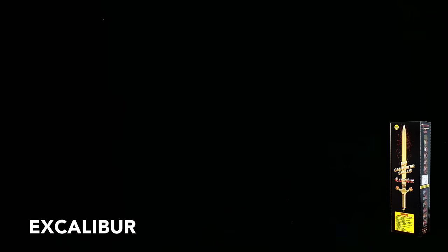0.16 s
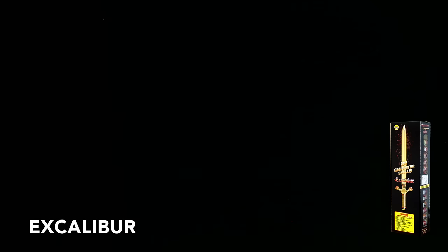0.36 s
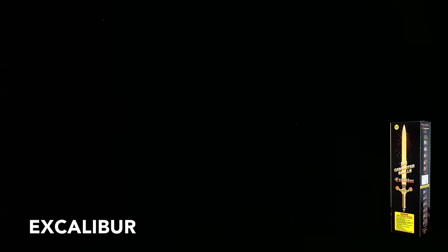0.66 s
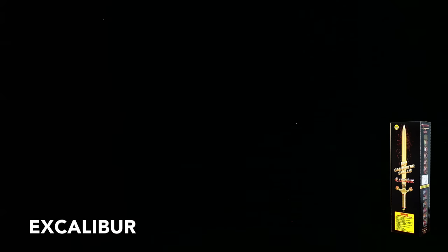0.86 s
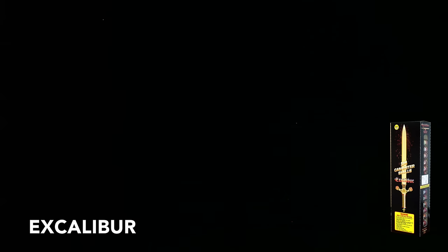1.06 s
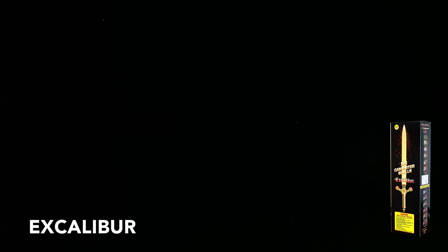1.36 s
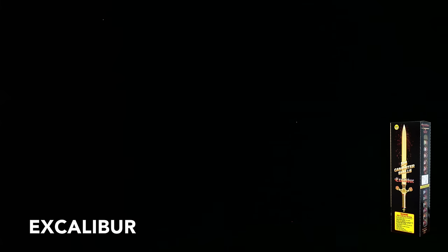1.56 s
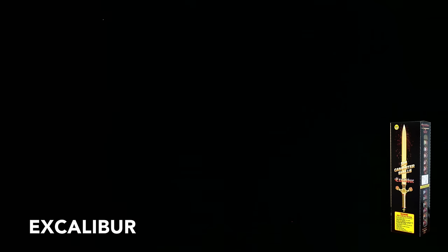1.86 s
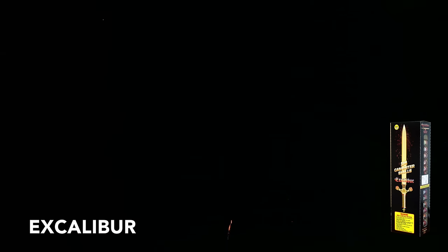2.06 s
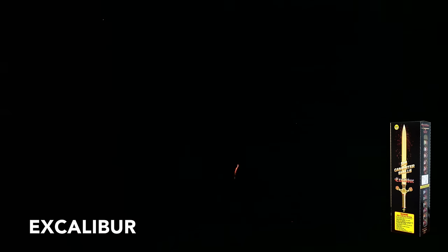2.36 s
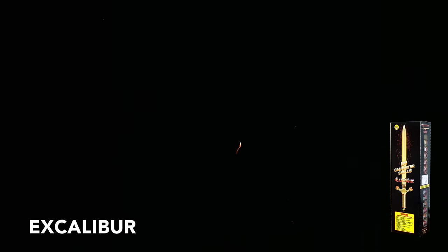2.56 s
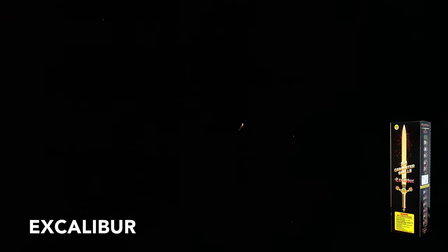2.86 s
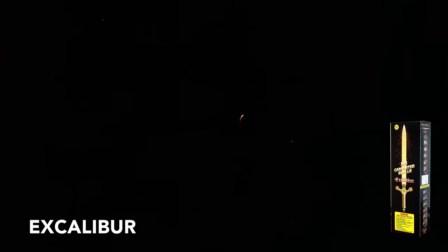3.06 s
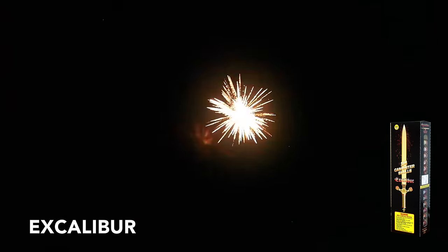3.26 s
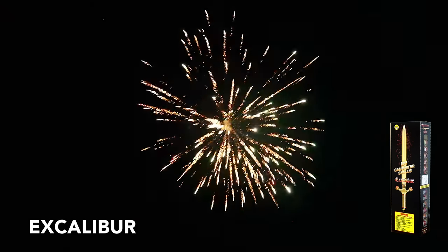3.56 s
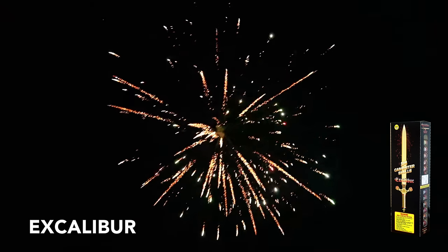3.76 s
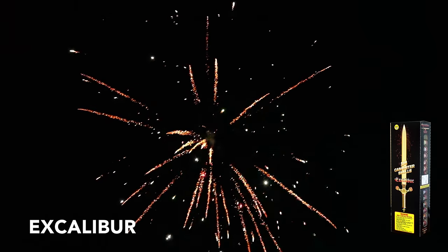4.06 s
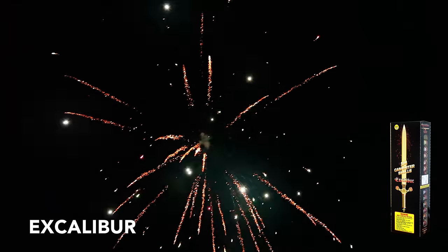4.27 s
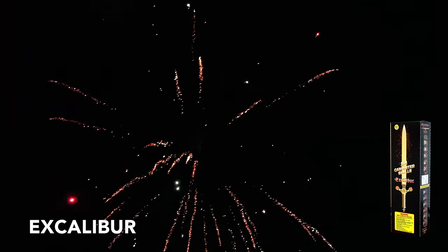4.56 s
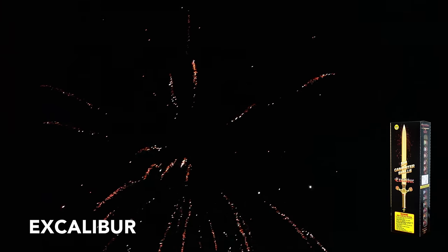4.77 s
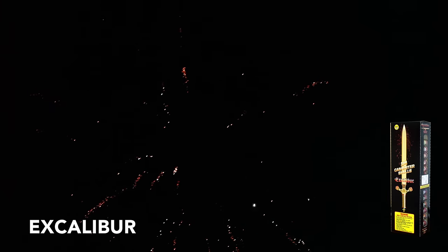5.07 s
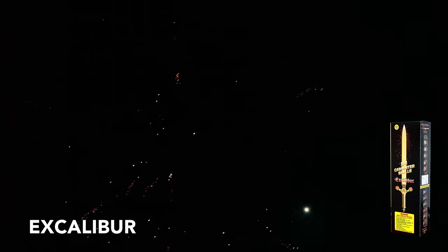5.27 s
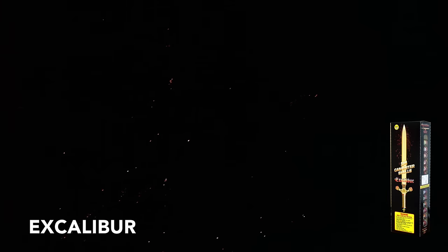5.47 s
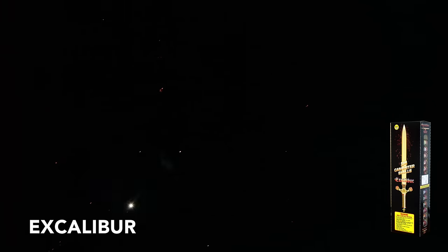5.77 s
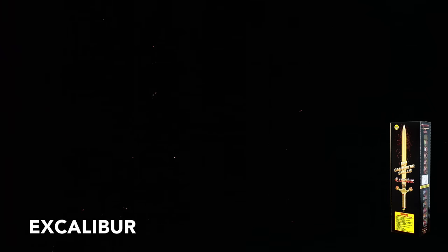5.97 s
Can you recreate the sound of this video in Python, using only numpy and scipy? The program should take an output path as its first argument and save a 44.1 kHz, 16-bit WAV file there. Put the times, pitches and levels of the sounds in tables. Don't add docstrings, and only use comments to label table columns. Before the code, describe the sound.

A quiet night outdoors, heard through a small stereo camera microphone: soft hiss, a very faint fan hum, light low wind flutters and a tiny creak at 0.2 s. At about 1.53 s gas spits, then a hard, clipped launch crack and thump hits at 1.55 s. Slaps and a mid-bright echo return over a low boom, thinning through 2.5 s, while the ducked background hiss recovers. From 2.3 s a faint fuse sputters in quickening pulses, partly hidden by strong low wind buffets from 2.7 s and dull pops at 3.2 and 3.4 s. At 3.45 s the burst explodes, far louder, heavily overloaded, with a short churning roar and strong slaps until 3.65 s. Its echo swells around 3.7 and 4.4 s, sliding duller over a rolling boom. Wind thumps near 5.3 and 5.5 s; late slaps and a small echo swell come around 6 s.

```python
import sys
import numpy as np
from scipy import signal
from scipy.fft import rfft, irfft, next_fast_len
from scipy.io import wavfile
from scipy.ndimage import uniform_filter1d, map_coordinates

SR = 44100
rng = np.random.default_rng(int(sys.argv[2]) if len(sys.argv) > 2 else 0)


def attenuation_scalar(level_db):
    decades = np.asarray(level_db, float) / 20
    return 10 ** decades


def generate_wav(signal):
    frames = np.transpose(np.atleast_2d(signal))
    scaled = np.clip(frames, -1, 1) * 32767
    pcm = np.round(scaled).astype(np.int16)
    wavfile.write(sys.argv[1], SR, pcm)


N = 270333
BLAST_S = (1.548, 3.453)

# [f/Hz, likeness]
NIGHT_TONE = [(18, -29), (40, 0), (90, -2), (200, -10.5), (300, -6.5), (900, -11), (1800, -13.5),
              (2800, -13.5), (15500, -16.5)]
NIGHT_ALIKE = [(300, 0.63), (1400, 0.91), (3000, 0)]
# [f/Hz, level/dB rms]
FAN_HUM = [(344, -63.5), (688, -69.5)]
NIGHT_DB = -58

# [f/Hz, level/dB per Hz]
WIND_TONE = [(15, -58), (30, -23.5), (60, -13), (90, 7), (130, -1), (210, -8.5), (290, -24), (400, -26),
             (520, -32.5), (800, -46.5), (1500, -88.5)]
# [t/s, level/dB]
BREEZE = [(0, -62.5), (1.5, -70.5), (2.1, -41), (4.0, -47), (4.6, -46.5), (5.7, -46.5), (6.13, -51.5)]
# [t/s, hold/s, level/dB, left-
# right/dB]
GUSTS = [(0, 0.074, -56.5, -10), (0.173, 0.14, -54, -3), (0.335, 0.052, -52, -3), (.498, 0, -57, -10),
         (.664, 0.033, -59, -7), (0.754, 0.064, -55.5, 1), (.948, 0.043, -62, -14), (1.04, 0.063, -59, -5),
         (1.232, 0, -51, -10), (1.44, 0.051, -55, -2), (1.527, 0.064, -41, -2), (2.677, .06, -38, -4.5),
         (2.781, 0.109, -31, -3.5), (2.898, 0.25, -28.5, 0.5), (3.228, 0.022, -33, -0.5),
         (3.419, 0.076, -30, -4.5), (4.184, 0.14, -53, -3), (4.446, 0.014, -36.5, -4),
         (5.2, 0.037, -41, -5.5), (5.291, .13, -28.5, -0.5), (5.266, .02, -30, 2), (5.539, 0.011, -30, 1),
         (5.846, 0.04, -36.5, 1), (6.09, .04, -45, -3)]
BREEZE_PAN_DB = -1.5
GUST_RISE_DB, GUST_FALL_DB = 0.66, 0.86

# [t/s, peak/dB, f/Hz, left-right/dB]
CREAKS = [
    (0.2119, -38, 6005, -4),
]
# [t/s, peak/dB, f/Hz, left-right/dB]
POPS = [
    (0.944, -38, 82, -15),
    (3.219, -26, 182.7, -3),
    (3.409, -20, 115, 12),
    (5.514, -18, 108.6, 1),
    (6.008, -28.5, 204, -3.5),
]
# [t/s, peak/dB, f/Hz, left-right/dB]
SLAPS = [(1.642, -26, 760, -13), (1.659, -27, 1226, 7), (1.697, -24, 1295, 6.5), (1.777, -37.5, 1380, -30),
         (1.916, -38.5, 1547, -13.5), (1.965, -37.5, 815, -15), (2.012, -33, 1263, 0.5),
         (2.219, -38, 1300, -4), (2.284, -40, 1430, 6.5), (2.434, -36.5, 711, 0), (3.536, -5.5, 490, -11),
         (3.554, -3, 395, 4), (3.579, -40.5, 1440, 3.5), (3.64, -10, 700, -12.5), (3.819, -17, 820, -20.5),
         (4.46, -17, 810, -11), (4.66, -32, 700, -10), (5.118, -21, 663, -17), (5.203, -21, 830, -13),
         (5.294, -23, 730, -17), (5.855, -29, 715, 2), (5.906, -21.5, 730, -4), (6.002, -20.5, 793, -13.5),
         (6.009, -17.5, 435, -11), (6.035, -28, 784, -16), (6.086, -38, 860, -10)]

FUSE_TURNS = [2.28, 2.461, 2.629, 2.72, 2.821, 2.9, 2.999, 3.13, 3.269, 3.39, 3.44]
# [f/Hz, level/dB per Hz]
FUSE_TONE = [(1100, -29), (1900, -0.5), (2700, 4), (3600, -4), (5000, -13), (7500, -30)]
FUSE_DB, FLARE_DB, FLARE_S = -58, 6.5, 0.16

# [f/Hz, level/dB per Hz]
BOOM_TONE = [
    [(50, -27), (110, 6), (200, 6.5), (250, -6), (330, -9.5), (480, -36)],
    [(50, -30.5), (110, -3), (200, 2.5), (280, -7), (380, -16), (520, -48)],
]
# [level/dB, loss/dB per decade of path, first thump/dB, thump t60/s]
BOOM_START = [
    (-10.5, 52, -22.5, .1),
    (0.5, 49.5, -13.5, 0.097),
]
BOOM_WALL_S, PEAL_DB = .2, 3

# [level/dB, first wall/s, loss/dB per decade of path, treble/dB, treble loss/dB per s]
LAUNCH_ECHO = (-15, .22, 46.5, -4.5, 16)
BURST_ECHO = (-4, 0.3271, 45, -10.5, 7)
# [first f/Hz, last f/Hz, slide/s, strength/dB, fade/s]
LAUNCH_BOUNCE = (1500, 1150, 1.2, 5.5, .7)
BURST_BOUNCE = (1480, 570, 1.66, 14.4, 0.78)
# [f/Hz, level/dB per Hz]
LAUNCH_ECHO_TONE = [(180, -52.5), (300, -15), (441, -17), (485, -10), (557, -11.5), (666, -4), (1400, -5),
                    (2630, -18), (4880, -27.5), (8000, -46.5), (10400, -94), (17600, -120)]
BURST_ECHO_TONE = [(160, -30), (280, -11), (316, -7), (487, -5.5), (541, -7), (873, -1.5), (1010, -9),
                   (1230, -10.5), (1790, -14), (2140, -14), (5330, -27), (10000, -52), (13000, -74),
                   (22000, -120)]
# [f/Hz, likeness]
ECHO_ALIKE = [(130, 0.55), (640, 1), (1400, .22), (3100, -0.11), (6800, -0.051), (12000, -0.56)]
# [t/s, hold/s, lift/dB]
TREE_LINES = [
    (3.72, 0.085, 1.5),
    (4.101, 0.0072, -3),
    (4.393, .18, 1.5),
    (6.018, 0.013, 7),
    (6.083, 0.013, 8.5),
]
ECHO_BUILD_S, ECHO_PAN_DB = (0.059, 0.063), -3.5
SHEEN_DB, SHEEN_S = (1.5, 12.5), .15
DIP_DB, DIP_BELOW = 3, 2.7

# [t/s, hold/s, level/dB, rise/dB per ms, fall/dB per ms]
JET = [
    (1.5315, .004, -41, 14, 5),
    (1.5418, .0062, 0, 6.2, 11),
    (1.561, 0, -35, 1.8, .33),
]
# [t/s, hold/s, level/dB, rise/dB per ms, fall/dB per ms]
ROAR = [
    (3.4593, .0068, 2, 10, 1.9),
    (3.47, 0, -7, 10, .62),
]
# [f/Hz, level/dB per Hz]
JET_TONE = [(300, -40), (900, -13), (1500, -10), (2100, -2), (3000, -9), (3750, -1), (4700, -12),
            (6300, -17), (8000, -36), (15500, -45)]
ROAR_TONE = [(35, -39), (70, -17), (150, -2), (350, 4.5), (520, -15), (760, 0), (1500, -21), (2000, -10),
             (4100, -17.5), (7400, -25.5), (15500, -44.5)]
# [f/Hz, likeness]
JET_ALIKE = [(1000, .9), (3000, 0.65), (8000, 0.098)]
ROAR_ALIKE = [(130, 0.3), (400, .1), (1400, .2), (6800, -0.33)]

# [t/s, overpressure level/dB, positive phase/ms, sign]
FRONTS = [(1.549, 4, 3.2, -1), (1.5515, 9, 2.7, 1), (3.4531, 22, .25, 1), (3.4534, 16, 2.2, -1),
          (3.4556, 22, 2.6, 1), (3.4588, 14, 1.8, -1), (3.4605, 18, 2.1, 1), (3.4633, 16, 1.3, 1),
          (3.4661, 10, .9, 1), (3.4671, 12, 2, -1), (3.4692, 8, 1.2, 1)]
LEFT_LEAD_S = .00009

# [t/s, level/dB]
CEILING = [
    (1.547, 0),
    (1.55, -6),
    (1.6, -6),
    (1.7, 0),
]
DUCK_DB = (32.5, 26.5)
REST_DB, GRAB_S = 3.5, .006
KNEE_DB, QUICK_DB, SLOW_DB = 7, 16.5, 3.5


def unit(x):
    return x / np.sqrt(np.mean(x ** 2) + 1e-20)


def along(points, hz):
    f, v = np.transpose(points)
    return np.interp(np.log(hz + 1), np.log(f + 1), v)


def curve(rows):
    return np.interp(np.arange(N) / SR, *np.transpose(rows))


def wobble(rate):
    knots = rng.standard_normal(int(N * rate / SR) + 4)
    return map_coordinates(knots, [np.arange(N) * rate / SR])


def plateau(s, hold, db, rise_db, fall_db):
    ms = (np.arange(N) / SR - s) * 1000
    return db + rise_db * np.minimum(ms, 0) - fall_db * np.maximum(ms - hold * 1000, 0)


def filtered(x, response):
    m = next_fast_len(N + 8192)
    return irfft(rfft(x, m) * response(np.fft.rfftfreq(m, 1 / SR)), m)[..., :N]


def rush(tone, alike, lo_hz=0, hi_hz=22050, patchy_db=0.):
    z = signal.stft(rng.standard_normal((2, N)), nperseg=256)[2]
    field = rng.standard_normal(z.shape[1:])
    for axis in (0, 1):
        field = uniform_filter1d(field, size=5, axis=axis)
    pair = signal.istft(z * attenuation_scalar(patchy_db * unit(field)), nperseg=256)[1][:, :N]

    def spread(hz):
        angle = np.arccos(np.clip(along(alike, hz), -1, 1)) / 2
        return attenuation_scalar(along(tone, hz)) * [np.cos(angle), np.sin(angle)]

    mid, side = filtered(pair, spread)
    band = filtered(mid, lambda hz: (hz > lo_hz) & (hz < hi_hz))
    return np.array([mid + side, mid - side]) / np.std(band)


def age(blast):
    return np.maximum(np.arange(N) / SR - BLAST_S[blast], 0)


def camera_db():
    duck = []
    for k, db in enumerate(DUCK_DB):
        quick = db - QUICK_DB * age(k)
        slow = KNEE_DB + (quick - KNEE_DB) * SLOW_DB / QUICK_DB
        release = np.maximum(np.maximum(quick, slow), 0)
        duck.append(release * (1 - np.exp(-age(k) / GRAB_S)))
    return REST_DB - np.max(duck, axis=0)


def night():
    gain_db = camera_db()
    turns = np.cumsum(1 + 0.002 * wobble(1.6)) / SR
    hum = 0
    for hz, db in FAN_HUM:
        hum = hum + attenuation_scalar(db + 2.0 + 1.9 * wobble(16)) * np.sin(2 * np.pi * hz * turns)
    hiss = rush(NIGHT_TONE, NIGHT_ALIKE, 400, 15500)
    return attenuation_scalar(gain_db + NIGHT_DB) * hiss + attenuation_scalar(0.69 * gain_db) * hum


def wind():
    side = np.c_[[.5, -.5]]
    push_db = curve(BREEZE) + camera_db() + 3 * wobble(8) + side * BREEZE_PAN_DB
    for s, hold, db, pan_db in GUSTS:
        gust_db = plateau(s, hold, db, GUST_RISE_DB, GUST_FALL_DB) + side * pan_db
        push_db = np.maximum(push_db, gust_db)
    flutter = attenuation_scalar(.6 * np.array([wobble(30), wobble(30)]))
    swing = rush(WIND_TONE, [(100, .05)], 40, 280) * flutter
    lopsided = swing + 0.021 * (swing ** 2 - uniform_filter1d(swing ** 2, size=2000))
    return attenuation_scalar(push_db) * lopsided


def knocks(rows, t60, rough, trim_db):
    out, t = np.zeros((2, N + 4096)), np.arange(4096) / SR
    for (s, db, hz, pan_db), grit in zip(rows, rng.standard_normal((len(rows), 2, 4096))):
        drift = np.cumsum(uniform_filter1d(grit, size=int(SR / hz / 2)), axis=1)
        phase = 2 * np.pi * hz * t + rough * np.sqrt(hz / SR) * drift
        shape = attenuation_scalar(-60 * t / t60) * (1 - np.exp(-t * hz * 1.9))
        gain = attenuation_scalar(db + trim_db + np.c_[[pan_db, -pan_db]] / 2)
        out[:, round(s * SR):][:, :4096] += gain * shape * np.sin(phase)
    return out[:, :N]


def creaks():
    return knocks(CREAKS, 0.045, rough=0.73, trim_db=-4.0)


def pops():
    return knocks(POPS, 0.114, rough=0.92, trim_db=0.5)


def fuse():
    t = np.arange(N) / SR
    swell = sum(np.exp(-((t - s) / 0.036) ** 2) for s in FUSE_TURNS)
    swell = swell + 0.56 * (t > FUSE_TURNS[0])
    flare_db = FLARE_DB * np.exp(-np.abs(BLAST_S[1] - t) / FLARE_S)
    gain = attenuation_scalar(FUSE_DB + flare_db + camera_db()) * (t < BLAST_S[1])
    return swell * gain * rush(FUSE_TONE, [(3000, 0.77)])


def slaps():
    return knocks(SLAPS, 0.0293, rough=2.7, trim_db=-4.0)


def returns(blast, db, wall_s, build_s, spread_db):
    t = age(blast)
    path_db = db - spread_db * np.log10(1 + t / wall_s)
    return attenuation_scalar(path_db + camera_db()) * (1 - np.exp(-(t / build_s) ** 3))


def boom(blast):
    db, spread_db, thump_db, t60 = BOOM_START[blast]
    thump = attenuation_scalar(thump_db - 60 * age(blast) / t60) * (age(blast) > .008)
    peals = returns(blast, db + PEAL_DB * wobble(12), BOOM_WALL_S, .02, spread_db)
    return (thump + peals) * rush(BOOM_TONE[blast], ECHO_ALIKE, 120, 300)


def strokes(rate, life, depth):
    hits = (rng.random(N) < rate / SR) * rng.random(N)
    decays = signal.lfilter([1], [1, -np.exp(-1 / (life * SR))], hits)
    return unit(1 + depth * uniform_filter1d(decays, size=60))


def echo(blast, walls, ground, tone, lo_hz, hi_hz, treble_db):
    db, wall_s, spread_db, bright_db, dull_db = walls
    first_hz, last_hz, slide_s, strength_db, fade_s = ground
    scatter = rush(tone, ECHO_ALIKE, lo_hz, hi_hz, patchy_db=0.5)
    body = filtered(scatter, lambda f: 1 / (1 + (f / 1900) ** 4))
    scatter = scatter + body * (strokes(70, .008, depth=1.2) - 1)

    hz, t, z = signal.stft(scatter, SR, nperseg=512)
    t = np.maximum(t - BLAST_S[blast], 0)
    peak_hz = last_hz + (first_hz - last_hz) * np.exp(-t / slide_s)
    octaves_up = np.maximum(np.log2(hz / 1700 + 1e-3), 0)
    bounce = np.exp(-(np.log2(hz[:, None] / peak_hz + 1e-3) / 0.33) ** 2)
    dip = np.exp(-(np.log2(hz[:, None] * DIP_BELOW / peak_hz + 1e-3) / 0.71) ** 2)
    sheen_db = SHEEN_DB[blast] * np.exp(-t / SHEEN_S)
    colour_db = np.outer(octaves_up ** 0.52, bright_db + sheen_db - dull_db * t - treble_db)
    colour_db += bounce * strength_db * np.exp(-t / fade_s) - DIP_DB * dip
    coloured = signal.istft(z * attenuation_scalar(colour_db), SR, nperseg=512)[1][:, :N]

    pan_db = ECHO_PAN_DB / 2 * (1 - np.exp(-age(blast) / .2))
    gain = returns(blast, db, wall_s, ECHO_BUILD_S[blast], spread_db)
    return gain * attenuation_scalar([pan_db, -pan_db]) * coloured


def echoes():
    launch = echo(0, LAUNCH_ECHO, LAUNCH_BOUNCE, LAUNCH_ECHO_TONE, 700, 1800, treble_db=-18.0)
    burst = echo(1, BURST_ECHO, BURST_BOUNCE, BURST_ECHO_TONE, 340, 1010, treble_db=-15.5)
    lifts_db = [plateau(*row, rise_db=0.3, fall_db=0.96) for row in TREE_LINES]
    lift_db = np.maximum(np.max(lifts_db, axis=0), 0)
    return launch + attenuation_scalar(lift_db) * burst + boom(0) + boom(1)


def jet():
    level_db = np.max([plateau(*row) for row in JET], axis=0)
    return attenuation_scalar(level_db) * rush(JET_TONE, JET_ALIKE)


def roar():
    level_db = np.max([plateau(*row) for row in ROAR], axis=0)
    return attenuation_scalar(level_db) * rush(ROAR_TONE, ROAR_ALIKE)


def fronts():
    out, t = np.zeros(N), np.arange(N) / SR
    for s, db, ms, sign in FRONTS:
        near = slice(int(s * SR), int(s * SR) + 2048)
        u = np.maximum(t[near] - s, 0) * 1000 / ms
        jump = 1 - np.exp(-u * ms / .05)
        out[near] += sign * attenuation_scalar(db) * (1 - u) * np.exp(-1.2 * u) * jump

    def ring(f, hz=205, width_hz=70):
        damping = 1j * f * width_hz
        return 1 + attenuation_scalar(-9.5) * damping / (hz * hz - f * f + damping)

    def lead(f):
        return np.exp(1j * np.pi * f * LEFT_LEAD_S * np.c_[[1, -1]])

    return filtered(filtered(out, ring), lead)


def scene():
    background = night() + wind() + creaks() + pops()
    surroundings = slaps() + echoes()
    shell = fuse() + jet() + roar() + fronts()
    return background + surroundings + shell


def band_limit(x):
    return signal.sosfilt(signal.butter(12, 16190, fs=SR, output="sos"), x)


def record(dry):
    top = attenuation_scalar(curve(CEILING))
    limited = dry / (1 + np.abs(dry / top) ** 16) ** (1 / 16)
    return band_limit(limited)


dry = scene()
out = record(dry)
generate_wav(out)
```